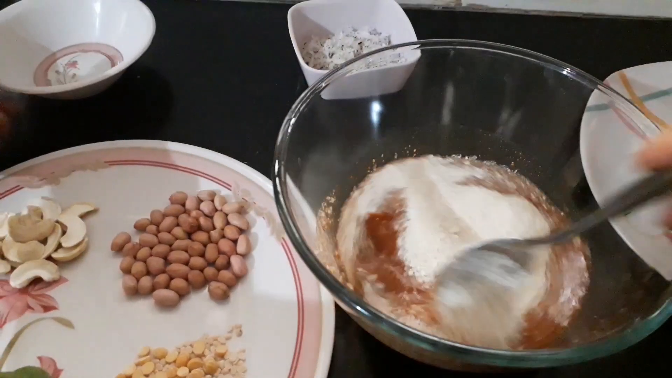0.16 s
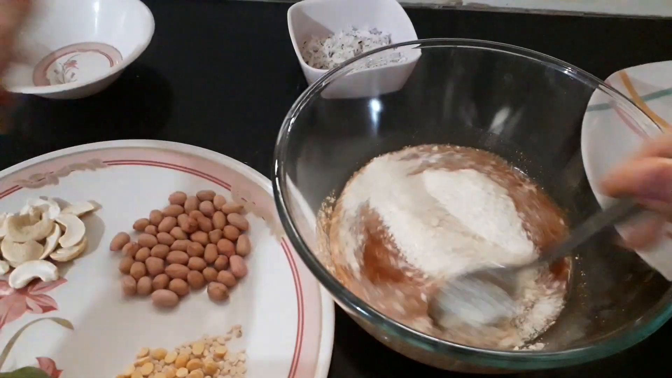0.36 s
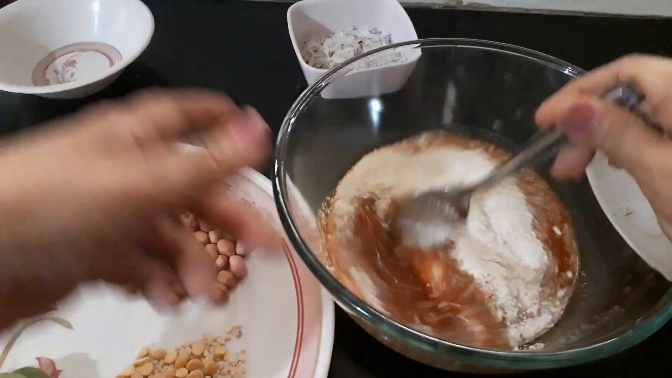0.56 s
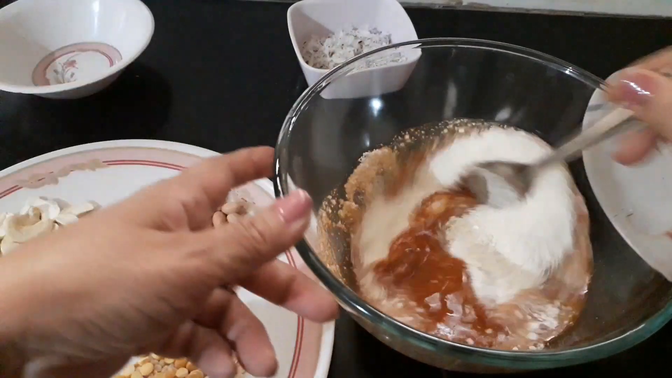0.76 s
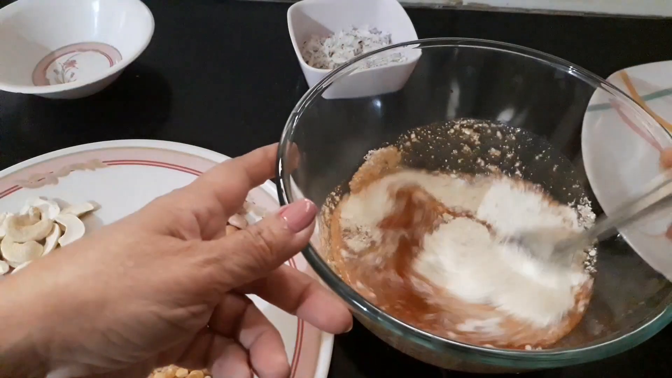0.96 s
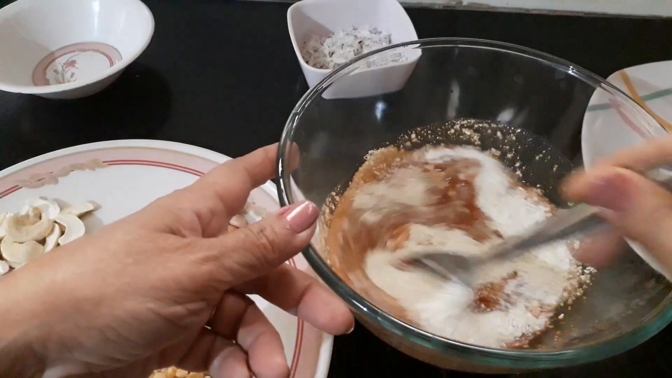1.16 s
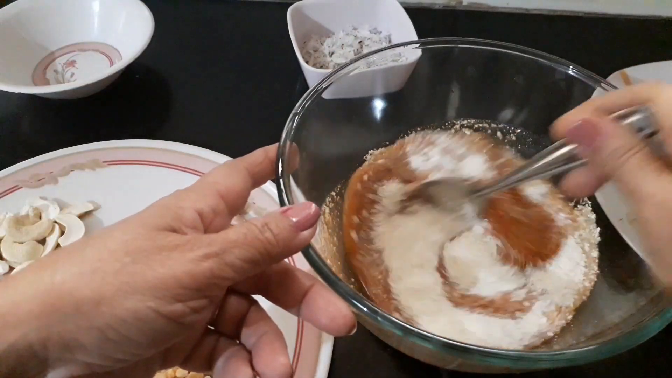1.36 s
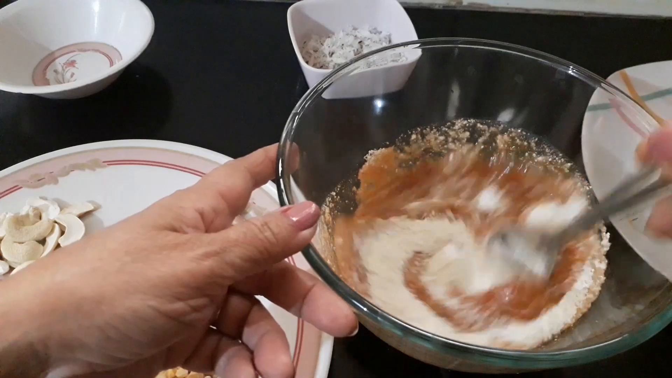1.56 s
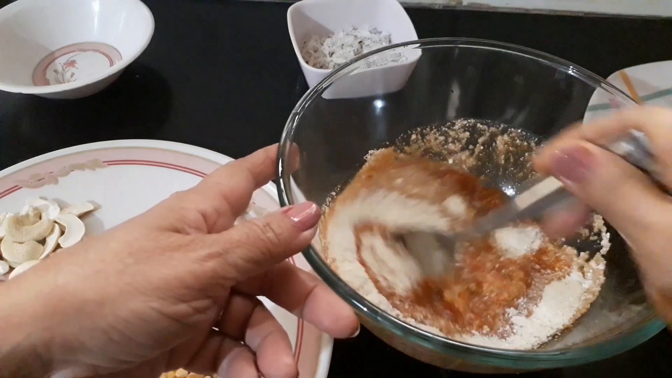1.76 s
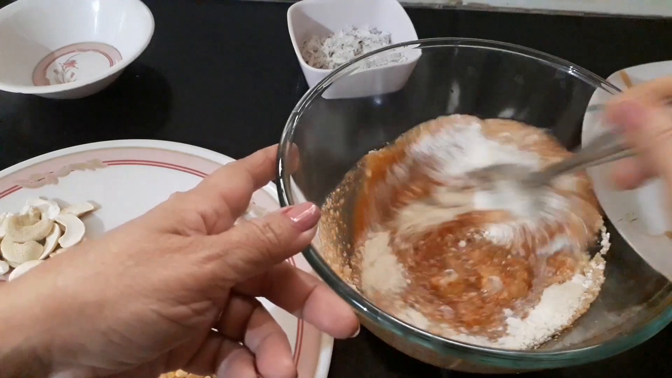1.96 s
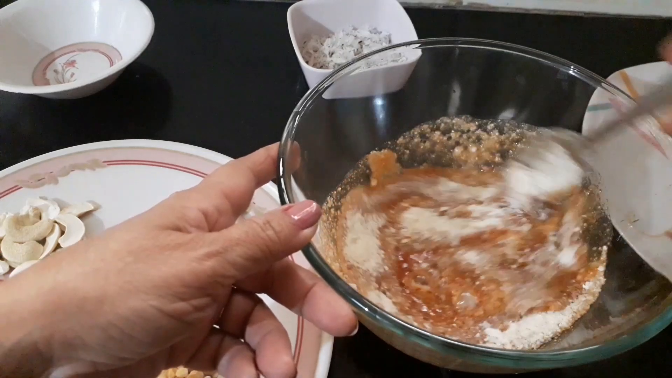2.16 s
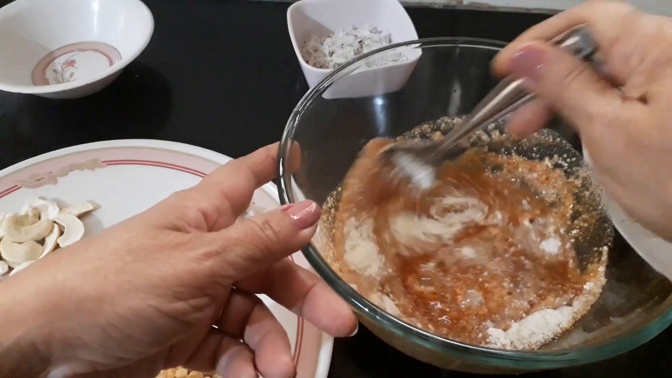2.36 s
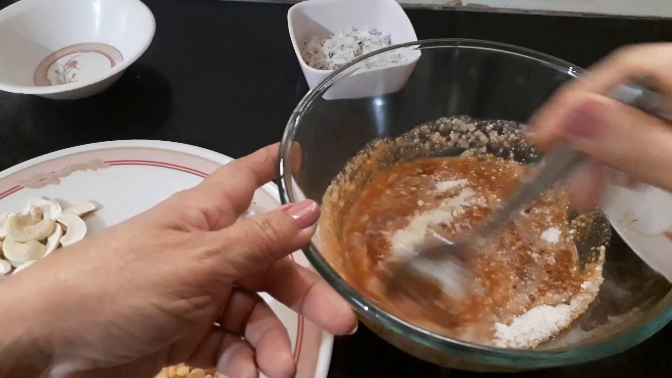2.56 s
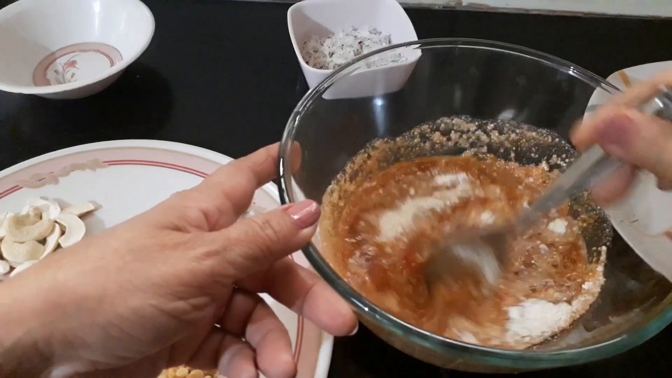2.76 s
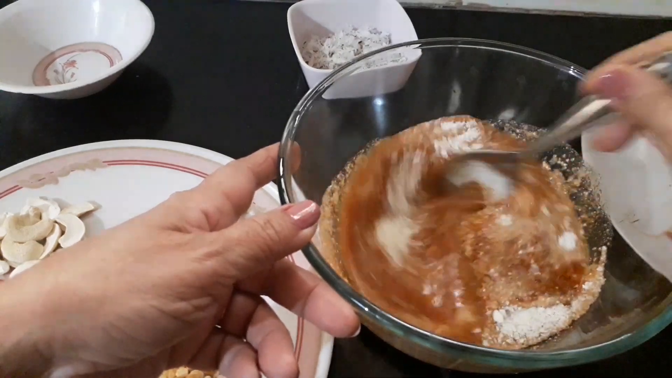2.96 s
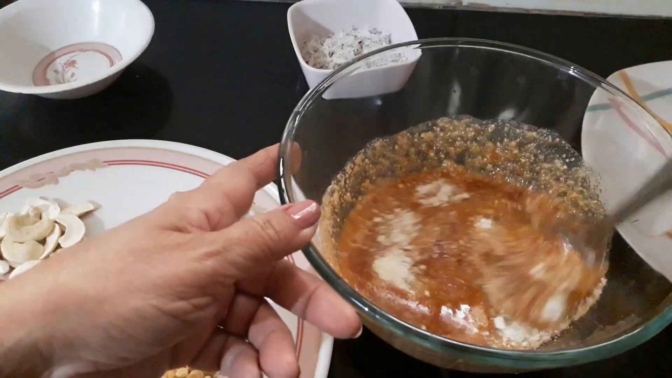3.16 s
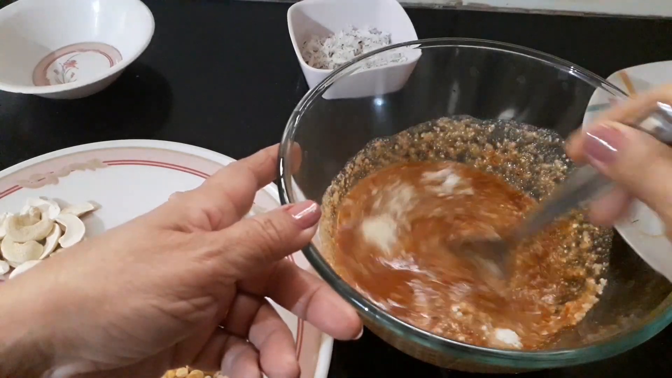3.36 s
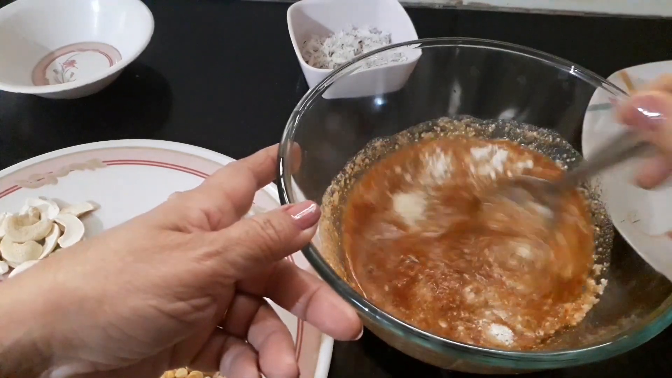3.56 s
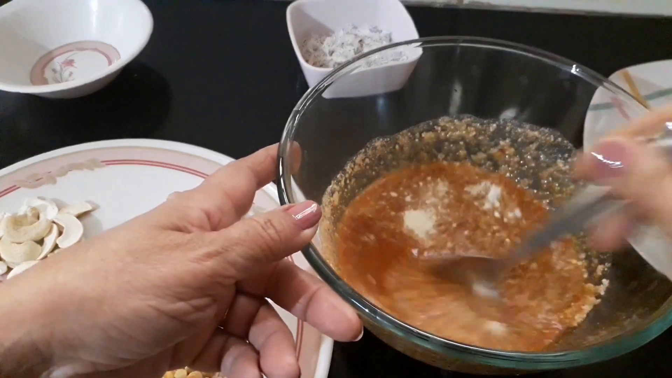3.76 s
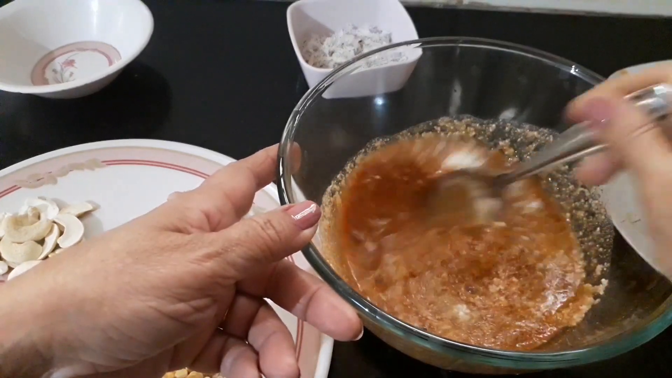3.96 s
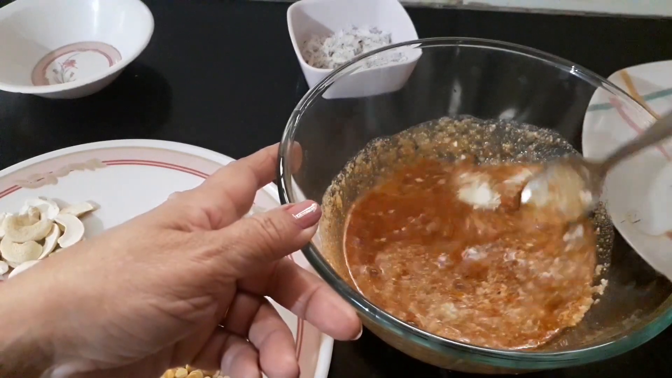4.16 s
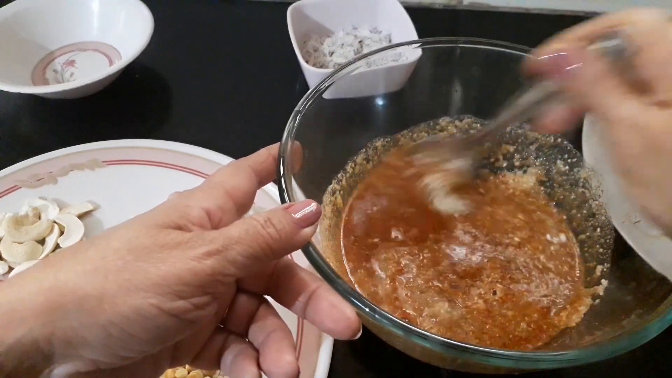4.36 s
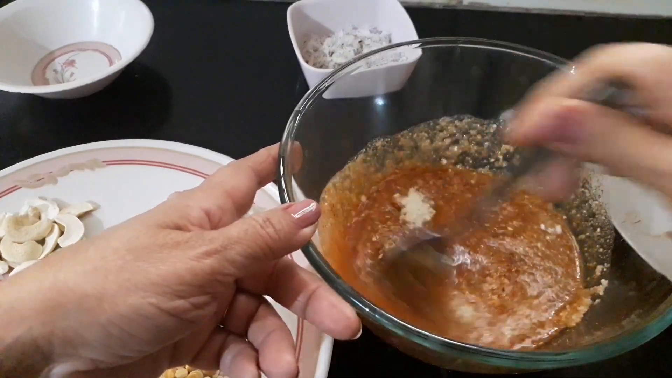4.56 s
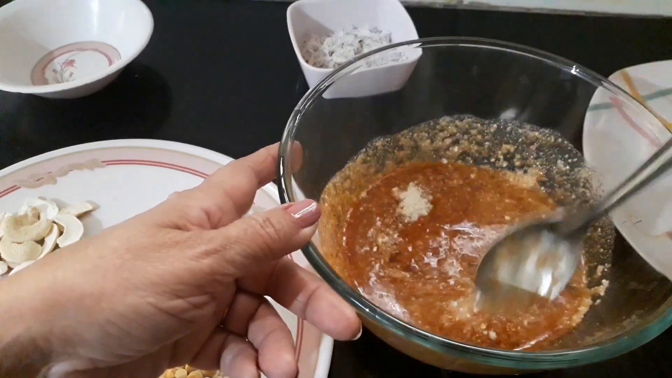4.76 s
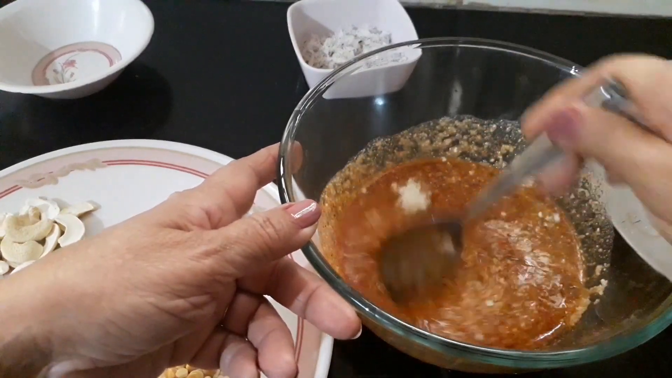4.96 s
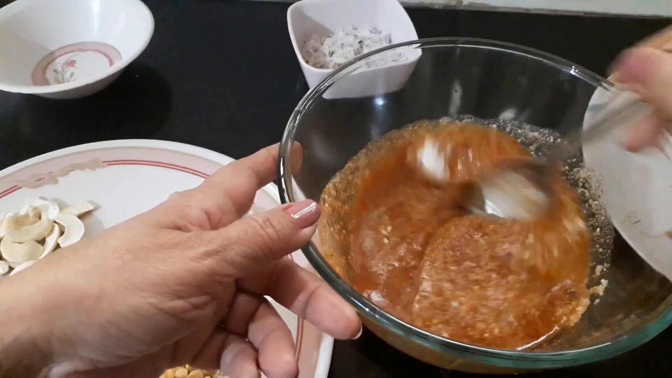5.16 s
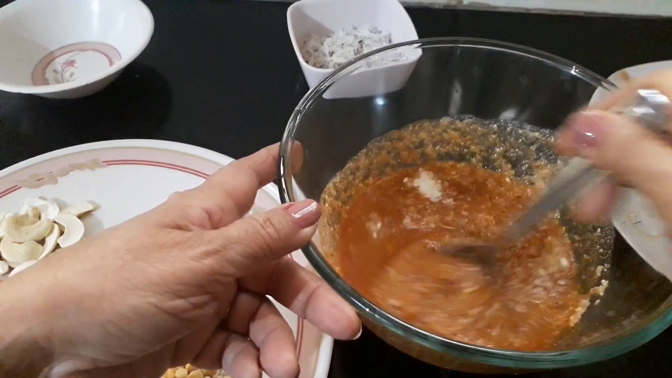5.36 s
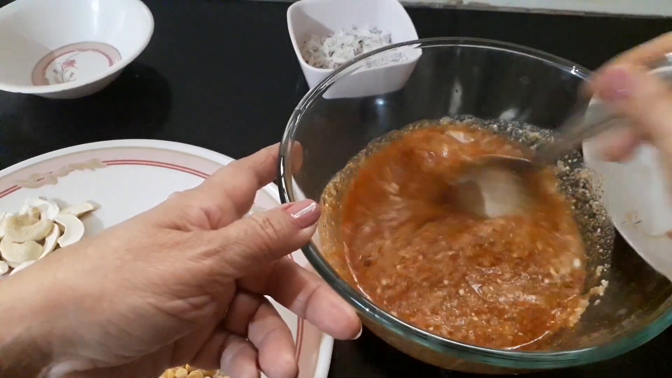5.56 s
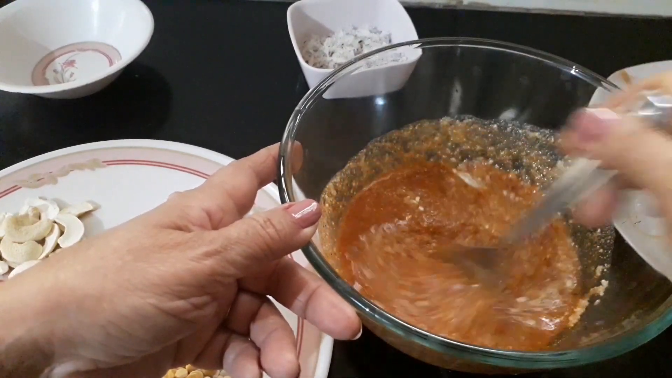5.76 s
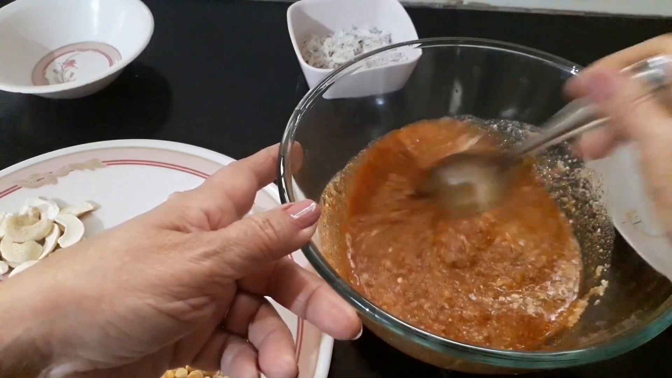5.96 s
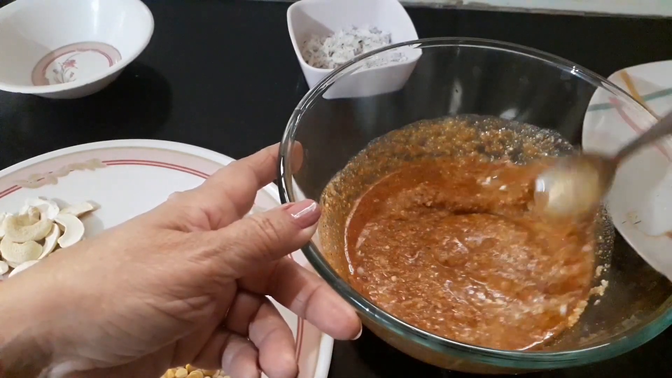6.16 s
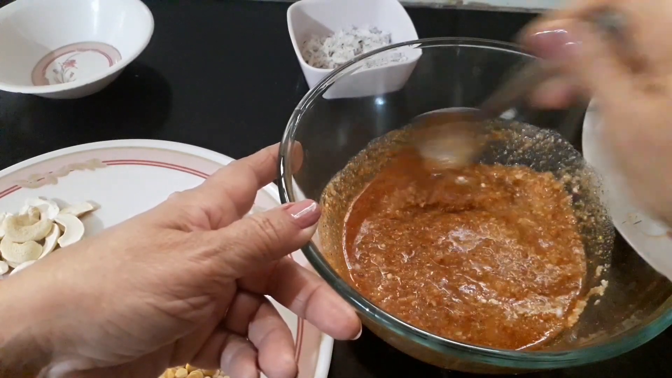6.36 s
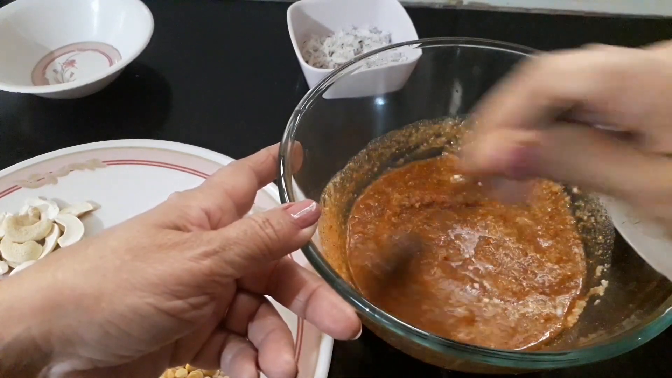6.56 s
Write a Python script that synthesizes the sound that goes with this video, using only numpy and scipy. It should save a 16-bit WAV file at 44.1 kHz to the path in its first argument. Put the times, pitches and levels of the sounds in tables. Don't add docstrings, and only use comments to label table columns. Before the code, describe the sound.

A spoon works a thick mixture in a glass bowl held on a worktop. The opening is quiet, with light ticks, grit and low knocks. Regular sharp glassy clinks follow, each a tiny graze, hit and skip, loudest near the middle and still strong late. Paste slops faintly between. Close microphone, short kitchen reverberation, quiet appliance hum and far traffic.

```python
import sys
import numpy as np
from scipy import signal
from scipy.io import wavfile
from scipy.ndimage import uniform_filter1d

SR = 44100
rng = np.random.default_rng(int(sys.argv[2]) if len(sys.argv) > 2 else 0)


def wav_out(sig):
    wavfile.write(sys.argv[1], SR, np.round(np.clip(np.atleast_2d(sig).T, -1, 1) * 32767).astype(np.int16))


def decibels_to_gain(level_db):
    exponent = np.asarray(level_db, float) / 20
    return 10 ** exponent


N = 291897

# t/s, peak level/dB, brightest f/Hz, graze level/dB, graze lead/ms
BLOWS = [
    (1.5838, -18.5, 11800, -27, 2.7),
    (2.0965, -10.5, 11900, -5, 5.8),
    (2.584, -4.5, 12300, -14, 3.7),
    (3.1622, -9.5, 9450, -19, 4.8),
    (3.695, -11, 11800, -21.5, 7.6),
    (4.1675, -2.5, 12170, -8.5, 10.7),
    (4.650, -9, 9260, -14, 4.2),
    (5.286, -8, 13230, -14, 5.4),
    (5.727, -4.5, 12420, -13.5, 5.8),
    (6.1597, -6, 9800, -6.5, 7.2),
]


def spoon(focus_db, focus_oct):
    # f/Hz, level/dB, t60/s
    glass_modes = [(2500, -30.5, 0.017), (3247, -30.5, 0.094), (3980, -29, 0.077), (4710, -28, 0.032),
                   (5580, -21.5, 0.072), (5997, -10, 0.032), (6270, -11, 0.072), (6830, -7.5, 0.073),
                   (7020, -7, 0.052), (7990, -7.5, .07), (8930, -4, 0.053), (9220, -4.5, 0.037),
                   (9800, -14, 0.032), (9600, 3, 0.054), (10400, 1, 0.037), (10800, 4, 0.051),
                   (10950, -10.5, 0.04), (11610, 3.5, 0.027), (11900, -8, 0.094), (12600, -12.5, 0.045),
                   (12600, 5.5, 0.067), (12800, -12, .03), (13700, -12.5, 0.058), (15100, -1.5, 0.04),
                   (14000, -4, 0.05), (14330, 2.5, 0.054), (15610, -14.5, .035)]
    s, peak_db, bright_hz, top_db, low_db, chatter = contacts()
    hard = np.clip((peak_db[:, None] + 35.5) / 22, 0, 1)
    choke = 2.2 + 1.4 * hard
    chatter_ms = (1.8 + 2.8 * hard) * chatter[:, None]

    def gain_db(hz):
        group_db = 0
        if hz > 12400:
            group_db = top_db + 10.5
        elif hz < 5500:
            group_db = low_db + 28.0
        focus = np.exp(-(np.log2(hz / bright_hz) / focus_oct) ** 2)
        return peak_db - 26.5 - .6 * hard[:, 0] + group_db + focus_db * focus

    out = 0
    for modes, cut_hz in ((glass_modes[:4], 2100), (glass_modes[4:], 5200)):
        rings = strike(modes, s, gain_db, chatter_ms, scatter_db=4.0, choke=choke, count=60)
        out = out + high_pass(rings, cut_hz, order=4)
    return out


def contacts():
    # t/s, peak level/dB, brightest f/Hz, skip level/dB, skip delay/ms
    rebounds = [
        (1.6045, -12.5, 12600, -20.5, 6.7),
        (2.114, -7, 12600, -25, 9.8),
        (2.600, -9, 13100, -17, 8.8),
        (3.1735, -15, 10400, -23.5, 7.4),
        (3.7181, -10.5, 10370, -36, 38),
        (4.1837, -9.5, 10230, -11, 6.9),
        (4.6758, -23, 9700, -53, 9),
        (5.3026, -12.5, 10800, -23, 14),
        (5.7523, -5.5, 9800, -15.5, 15.5),
        (6.178, -8, 10000, -33, 7.8),
    ]
    # t/s, peak level/dB, brightest f/Hz, top modes level/dB
    light_ticks = [(0.1708, -26, 9880, -11.5), (0.243, -48, 11300, -5), (0.4184, -55, 10300, -24),
                   (0.477, -51.5, 9640, -22), (0.9487, -53, 9800, -20), (1.6797, -29, 10500, -16.5),
                   (1.919, -57, 10600, -5.5), (2.379, -35, 11200, -24.5), (2.623, -27.5, 9000, -12),
                   (2.8616, -40, 9900, -15), (2.9784, -50, 11900, -16), (3.1028, -46.5, 11500, -12),
                   (3.1944, -24, 9800, -16), (1.477, -57, 11500, -13), (3.775, -27, 9600, -11),
                   (3.816, -35.5, 13000, -12.5), (4.0525, -46, 10630, -31.5), (4.088, -49.5, 9370, -22.5),
                   (4.462, -51, 11800, -12), (4.4933, -51.5, 7700, -16.5), (5.0016, -32, 9300, -14),
                   (5.086, -34.5, 10840, -37.5), (5.226, -48, 10400, -31), (5.241, -46, 10500, -18),
                   (5.271, -29.5, 12300, -23.5), (5.336, -20, 9220, -11.5), (5.7152, -30.5, 10700, -13.5),
                   (5.9958, -33, 11200, -33), (6.2736, -30, 9700, -14.5)]
    # t/s, peak level/dB, brightest f/Hz, low modes level/dB
    muffled_ticks = [(0.0514, -51, 7670, -22), (1.1772, -33, 8600, -21), (1.2465, -41, 8850, -25.5),
                     (1.357, -47, 8800, -25.5), (2.3695, -35.5, 9100, -14), (3.032, -51.5, 6360, -27),
                     (4.902, -34.5, 8140, -20.5), (5.506, -38, 5940, -22), (5.6262, -45, 6950, -22),
                     (5.976, -43, 6600, -27), (6.392, -23.5, 6700, -19)]
    # middle tick t/s, peak level/dB, brightest f/Hz, gap/ms, first tick level/dB
    stutters = [
        (0.0884, -31, 9900, 14, -35),
        (0.8389, -36.5, 9650, 7.5, -43),
        (1.039, -34, 11900, 13.8, -33.5),
        (2.9105, -38.5, 9600, 14, -42),
        (6.4850, -42, 7300, 17, -38),
    ]
    graze, blow, settle = (-15, -27.5), (-13, -22), (-12, -21.5)
    rebound, skip, stutter = (-14.5, -20.5), (-9, -19), (-16.5, -25)
    blow_chatter, rebound_chatter, skip_chatter = .8, .55, .6

    rows = [(s, db, hz, top_db, -18.5, 1) for s, db, hz, top_db in light_ticks]
    rows += [(s, db, hz, -27.5, low_db, 1) for s, db, hz, low_db in muffled_ticks]
    for s, db, hz, graze_db, lead_ms in BLOWS:
        rows += [(s - lead_ms / 1000, graze_db, 11800, *graze, 1),
                 (s, db, hz, *blow, blow_chatter),
                 (s + 0.0082, db - 12.5, 11200, *settle, skip_chatter)]
    for s, db, hz, skip_db, delay_ms in rebounds:
        rows += [(s, db, hz, *rebound, rebound_chatter),
                 (s + delay_ms / 1000, skip_db, 9700, *skip, skip_chatter)]
    for s, db, hz, gap_ms, first_db in stutters:
        rows += [(s - gap_ms / 1000, first_db, hz, *stutter, 1),
                 (s, db, hz, *stutter, 1),
                 (s + gap_ms / 1000, db - 2.5, hz, *stutter, 1)]
    return np.transpose(rows)


def strike(body, s, gain_db, chatter_ms, scatter_db, choke, count):
    wait = (rng.random((len(s), count)) * 4.6 - .9) * chatter_ms / 1000
    at = (np.clip(s[:, None] + wait, 0, None) * SR).astype(int).ravel()
    graze = .03 * np.exp(wait * 2500 / chatter_ms)
    attack = np.clip(0.23 + wait * 900 / chatter_ms, 0, 1)
    thinning = np.exp(-(wait * 520 / chatter_ms) ** 2)
    fade = np.where(wait < 0, graze, thinning * attack)
    fade = fade / np.sqrt(np.sum(fade ** 2, axis=1, keepdims=True))
    luck = rng.standard_normal((len(s), len(body)))
    grain = rng.standard_normal((len(s), 3, len(body), count))
    free, held = np.zeros((2, N))
    for k, (hz, level_db, t60) in enumerate(body):
        strength = decibels_to_gain(gain_db(hz) + level_db + scatter_db * luck[:, k])[:, None] * fade
        clicks = []
        for j, share in enumerate((1, choke, choke)):
            heights = strength * grain[:, j, k] * share
            clicks.append(np.bincount(at, heights.ravel(), N)[:N])
        free += ring(clicks[0], hz, t60)
        held += ring(clicks[1], hz * 1.025, t60 * .3)
        held += ring(clicks[2], hz * .975, t60 * .18)
    return free, held


def cracks():
    # t/s, peak level/dB, three ring f/Hz
    edge_taps = [(0.724, -58, 3620, 3950, 3300), (0.7360, -59, 3520, 4000, 4600),
                 (0.764, -54, 3320, 3800, 5200), (0.8150, -66, 3700, 4100, 4500),
                 (0.8350, -66, 3250, 3300, 3960), (0.9150, -58, 3150, 3200, 2900),
                 (0.9290, -62, 3170, 3050, 3400), (0.9490, -57, 4200, 4700, 5300),
                 (0.9560, -53, 3030, 2800, 4030), (1.6058, -9, 9600, 12600, 15100),
                 (1.6816, -26, 1900, 3160, 1140), (2.2510, -53.5, 509, 1492, 3900),
                 (2.2610, -43.5, 565, 1640, 3770), (2.2750, -52, 597, 1600, 3720),
                 (2.31, -58.5, 520, 1750, 3900), (2.37, -52, 3510, 3820, 4700),
                 (3.8167, -34, 1105, 3310, 6460), (3.8177, -35, 441, 1588, 3760),
                 (6.3932, -21.5, 4030, 4650, 6750), (6.3943, -22.5, 4620, 5720, 11600),
                 (6.4, -31.5, 3860, 6700, 2550), (6.475, -33, 4320, 4700, 7440),
                 (2.0914, -18, 9900, 12030, 14500), (2.1135, -16, 10000, 12300, 15000),
                 (5.754, -15, 10200, 12800, 15100), (5.768, -28, 10000, 12800, 15100),
                 (5.7950, -29, 10000, 12800, 15100), (4.8810, -49.5, 1100, 1500, 700),
                 (3.721, -23, 9900, 12500, 14500), (2.2280, -50, 12000, 14000, 10500),
                 (2.2620, -43, 12500, 9400, 6500), (1.1774, -28, 4220, 3310, 1206),
                 (1.2490, -48.5, 4400, 4020, 6500), (6.1790, -12, 9900, 11300, 13000),
                 (3.6970, -18.5, 12000, 12560, 7000), (1.9190, -50.5, 10960, 12860, 15020),
                 (5.9490, -58, 10400, 12540, 14000)]
    # t/s, peak level/dB, three ring f/Hz
    more_cracks = [
        (5.781, -27, 10000, 8200, 15100),
        (0.401, -60, 10000, 4000, 6500),
        (0.419, -58, 10500, 6000, 14500),
        (3.8168, -40, 9000, 11500, 14500),
        (3.756, -33, 10500, 12500, 15000),
        (1.477, -55.5, 11000, 13000, 15000),
        (5.139, -59, 9550, 6000, 3000),
        (5.227, -48, 9000, 11000, 12500),
        (4.6915, -34, 9800, 11500, 13500),
    ]
    events = edge_taps + more_cracks
    t = np.arange(2048) / SR
    out = np.zeros(N + len(t))
    for (s, db, *pitches), hiss in zip(events, rng.standard_normal((len(events), len(t)))):
        burst = hiss * np.exp(-t * 1000 / 0.97)
        burst = burst / np.sqrt(np.sum(burst ** 2))
        snap = band_pass(burst, min(pitches) * .6, min(max(pitches) * 1.6, 16000))
        rings = sum(ring(burst, hz, .026 * (1000 / hz) ** .5) for hz in pitches)
        rings = high_pass(rings, min(pitches) * .75, order=2)
        out[round(s * SR):][:len(t)] += decibels_to_gain(db) * (.5 * rings + decibels_to_gain(-9.5 + 11.0) * snap)
    return out[:N]


def drags(per_s):
    # from t/s, to t/s, level/dB, low f/Hz, high f/Hz
    grit_drags = [
        (0.713, 0.837, -76.5, 3420, 4200),
        (0.988, 1.06, -65.5, 3700, 5850),
        (4.489, 4.532, -66, 2500, 15500),
        (1.593, 1.607, -30, 7600, 15000),
        (6.395, 6.47, -60.5, 5020, 15000),
        (6.468, 6.502, -46.5, 3480, 15000),
    ]
    grains = grit_clicks(per_s, spread_db=2.5)
    out = 0
    for start, stop, db, low_hz, high_hz in grit_drags:
        out = out + decibels_to_gain(db) * gate(start, stop, 0.0059) * rms_one(band_pass(grains, low_hz, high_hz))
    return out


def lingers():
    # t/s, level/dB, f/Hz, t60/s
    singing_modes = [(2.100, -42, 6700, 0.31), (2.580, -49, 3250, .08), (2.600, -40, 3270, .1),
                     (2.655, -55.5, 850, 0.75), (0.833, -66, 3230, 0.18), (5.086, -42, 13000, 0.06),
                     (1.607, -36, 8200, .08), (3.697, -53, 3250, 0.15), (5.729, -36, 6700, 0.1),
                     (5.752, -28, 15000, .05), (0.97, -72, 4020, 0.38), (6.394, -51, 6620, 0.071),
                     (5.997, -54, 11100, 0.15), (3.765, -39, 12600, .04), (3.5, -56, 6800, 0.11),
                     (3.692, -33, 7000, .07), (4.461, -59, 12300, .04), (3.776, -43, 8200, .04),
                     (5.002, -57, 6700, 0.24), (5.768, -30, 15100, .04), (6.274, -42, 15300, .04)]
    steady_s = .035
    t = np.arange(SR // 2) / SR
    out = np.zeros(N + len(t))
    for (s, db, hz, t60), hiss in zip(singing_modes, rng.standard_normal((len(singing_modes), len(t) + 2000))):
        waver = rms_one(ring(hiss, hz, steady_s)[2000:]) + .8 * np.sin(2 * np.pi * hz * t)
        out[round(s * SR):][:len(t)] += decibels_to_gain(db - 4.5 - 60 * t / t60) * np.clip(t / .002, 0, 1) * waver
    return out[:N]


def paste(per_s):
    # t/s, level/dB
    stir_pressure = [(0.0, -45.5), (0.11, -74), (0.28, -60.5), (0.6, -70.5), (1.09, -63.5), (1.7, -73.5),
                     (1.9, -65), (2.1, -78), (2.269, -57.5), (2.7, -78.5), (2.93, -63), (3.52, -72.5),
                     (4.199, -69), (4.74, -78), (5.57, -68.5), (5.84, -63), (6.189, -77), (6.62, -67)]
    # t/s, level/dB, half length/s
    traffic_passes = [
        (0.1, -72, 0.085),
        (1.9, -68, 0.076),
        (3.999, -61, 0.34),
        (4.35, -65, 0.041),
        (5.306, -61, 0.18),
        (5.752, -56, 0.12),
        (6.52, -51, 0.26),
    ]
    grit_db = np.interp(np.arange(N) / SR, *np.transpose(stir_pressure))
    grains = grit_clicks(per_s, spread_db=2.1)
    grit = ring(grains, 9700, .002) + ring(grains, 11100, .0016)
    grit += .5 * ring(grains, 13500, .001) + .3 * ring(grains, 6800, .002)
    slop = swells(-67.5, [(s + 0.021, -63, 0.045) for s, *_ in BLOWS])
    slosh = rms_one(band_pass(rng.standard_normal(N), 357, 692))
    rumble = rms_one(band_pass(rng.standard_normal(N), 119, 227))
    out = decibels_to_gain(grit_db - 7) * rms_one(grit)
    out += slop * decibels_to_gain(-9.5 + 2.6 * drift(30)) * slosh
    return out + swells(-60.5, traffic_passes) * decibels_to_gain(-8.5) * rumble


def knocks(focus_db, focus_oct):
    # f/Hz, level/dB, t60/s
    bowl_modes = [(202.6, -13, 0.026), (364, -5.5, 0.015), (441, -4.5, 0.08), (562.4, -3, 0.046),
                  (700, -4.5, 0.038), (906, -14, 0.06), (1070, 6, 0.037), (1201, 1.5, 0.031),
                  (1409, -2, 0.04), (1610, -8.5, 0.15), (1840, 6, 0.02), (2096, -2, 0.035),
                  (2364, -6, 0.063), (2840, -7.5, 0.074), (3300, 0, 0.032), (3700, -4.5, 0.034),
                  (3920, -3, 0.042), (4400, -7.5, 0.012), (4950, 5, 0.0015), (5800, -10, 0.019),
                  (6940, -16.5, 0.01)]
    # t/s, peak level/dB, strongest ring f/Hz, middle modes level/dB, room level/dB
    bowl_thuds = [
        (0.328, -34.5, 1430, -32, -8.5),
        (1.011, -22.5, 1070, -22, -11),
        (1.038, -30, 910, -27, -8),
        (2.259, -37, 571, -38.5, -1.5),
        (2.653, -27, 438, -19.5, -6),
        (2.979, -56.5, 1610, -2, -14.5),
        (4.882, -31, 1404, -16.5, -2.5),
        (6.495, -54.5, 1430, 1.5, 3),
    ]
    # t/s, peak level/dB, strongest ring f/Hz, middle modes level/dB, room level/dB
    bowl_taps = [(0.736, -67, 3900, -40, -3), (0.764, -66, 3830, -39, -5), (0.955, -60, 2960, -20, -4),
                 (1.177, -26.5, 3470, -8, -10), (1.25, -41, 1330, -7.5, -2), (1.682, -34, 1850, -5, -9.5),
                 (2.37, -55, 3640, -30.5, -7), (3.108, -53.5, 3800, -34.5, -17),
                 (3.324, -47.5, 1840, -9, -11.5), (3.817, -43, 1120, -1.5, -4),
                 (4.169, -30.5, 5290, -10, -19), (4.904, -26, 3660, -19, -14),
                 (5.248, -53, 2790, -6.5, 0.5), (5.344, -34.5, 1070, -8.5, -13),
                 (5.507, -52.5, 3900, -37, -12), (5.729, -37, 3460, -13.5, -6),
                 (6.393, -33, 2600, -11.5, -8.5), (6.474, -31, 4200, -27, -12.5)]
    rows = [(*row, -38.5) for row in bowl_thuds] + [(*row, -0.5) for row in bowl_taps]
    s, peak_db, ring_hz, middle_db, room_db, glassy_db = np.transpose(sorted(rows))

    def gain_db(hz):
        group_db = -6.0
        if hz > 2200:
            group_db = glassy_db
        elif hz > 900:
            group_db = middle_db
        focus = np.exp(-(np.log2(hz / ring_hz) / focus_oct) ** 2)
        return peak_db - 14.5 + group_db + focus_db * focus

    free, held = strike(bowl_modes, s, gain_db, 1.4, scatter_db=2.0, choke=1.58, count=40)
    latest = np.clip(np.searchsorted(s, np.arange(N) / SR) - 1, 0, None)
    return free + held, (0.6 * free + held) * decibels_to_gain(room_db)[latest]


def worktop():
    # t/s, level/dB
    thumps = [
        (4.169, -42.5),
        (5.726, -55),
    ]
    # t/s, level/dB, f/Hz, t60/s
    chime = (6.479, -49.5, 1356, 0.18)
    shove, tap = np.zeros((2, N))
    for s, db in thumps:
        shove[round(s * SR)] = decibels_to_gain(db)
    s, db, hz, t60 = chime
    tap[round(s * SR) + np.array([0, 260, 730])] = decibels_to_gain(db) * np.array([.7, 1, .6])
    thud = ring(shove, 85, 0.059) + ring(shove, 210, 0.055) + 0.54 * ring(shove, 570, 0.011)
    return thud + ring(tap, hz, t60)


def dish():
    # f/Hz, level/dB, t60/s
    dish_modes = [(417, -2.5, 2.0), (790, 4.5, 0.35), (1263, 5.5, 0.78), (1462, 12.5, 0.57),
                  (1810, 9, 0.83), (2034, 4.5, 0.55), (2670, 4.5, 0.31), (3800, -6.5, 0.22),
                  (4700, -12, 0.16), (4850, 3, 0.72), (5290, -4, 0.41), (8200, -11, 5.0), (7300, -8, 0.39)]
    t = np.arange(N) / SR
    start = np.arange(N) == 0
    shake = rng.standard_normal((len(dish_modes), N)) * decibels_to_gain(-60 * t / 0.51)
    rings = sum(decibels_to_gain(db) * ring(start, hz, min(t60, .5)) for hz, db, t60 in dish_modes)
    wash = sum(decibels_to_gain(db) * ring(e, hz, 0.012) for (hz, db, _), e in zip(dish_modes, shake))
    return decibels_to_gain(-56.5) * rings + decibels_to_gain(-42.5 - 21) * wash


def kitchen(x):
    # f/Hz, t60/s
    room_decay = [(300, 0.32), (800, 0.53), (2000, 0.35), (5500, 0.4), (10000, 0.22), (15000, .18)]
    t = np.arange(SR * 2 // 3) / SR
    white = rng.standard_normal((2, len(t)))
    tail = sum(b * decibels_to_gain(-60 * t / at_hz(room_decay, hz)) for hz, b in bands(white))
    tail = tail * np.clip((t - .003) / 0.0025, 0, 1)
    return signal.fftconvolve(x, tail / np.sqrt(np.sum(tail ** 2)))[:N]


def street():
    # f/Hz, level/dB
    horn_partials = [(1290, -2), (1707, -2), (2550, -5), (3385, -5), (3735, -1)]
    # from t/s, to t/s, level/dB, low partials level/dB
    horn_blasts = [
        (4.937, 5.265, -65, -19),
        (5.225, 5.93, -69, -32.5),
        (5.948, 6.425, -60, 4.5),
    ]
    # f/Hz, level/dB, length/s
    rim_squeak = [(1395, -78.5, 0.17), (1886, -72.5, 0.091), (2466, -76.5, 0.093), (3660, -75.5, 0.051)]
    squeak_s = 4.49
    out = np.zeros(N)
    for hz, level_db in horn_partials:
        on = sum(decibels_to_gain(db + low_db * (hz < 2000)) * gate(a, b, 0.061) for a, b, db, low_db in horn_blasts)
        tone = rms_one(ring(rng.standard_normal(N), hz, .11))
        out += on * decibels_to_gain(level_db - 16 + 3.5 * drift(4)) * tone
    for hz, db, long_s in rim_squeak:
        tone = rms_one(ring(rng.standard_normal(N), hz, 0.055))
        out += decibels_to_gain(db + 1.5) * gate(squeak_s, squeak_s + long_s, 0.023) * tone
    return out


def background(patchy_db):
    # f/Hz, level per Hz/dB
    noise_spectrum = [(18, -40), (30, -15.5), (75, 1.5), (194, -1.5), (295, -27.5), (384, -6), (540, -15.5),
                      (780, -35.5), (988, -25.5), (1670, -23), (2120, -28), (3770, -27), (8520, -33.5),
                      (10500, -15.5), (16000, -54)]
    # f/Hz, width/Hz, rms level/dB
    motor_hums = [(47, 14, -76), (85.5, 45, -66.5), (126, 5.3, -79.5), (217, 36, -72), (395, 49, -73),
                  (531, 4.9, -78)]
    together = drift(3.5)
    noise = 0
    for hz, b in bands(rng.standard_normal((2, N))):
        patchy = patchy_db * (0.25 * together + drift(13))
        noise = noise + b * decibels_to_gain(at_hz(noise_spectrum, min(hz, 14000)) + patchy)
    hum = 0
    for hz, width_hz, db in motor_hums:
        hum = hum + decibels_to_gain(db) * rms_one(ring(rng.standard_normal(N), hz, 4.4 / width_hz))
    return decibels_to_gain(-61 - 5.0) * rms_one(noise) + hum


def difference(mono):
    hiss_db, flutter_db, flutter_full_db = -84, -29.5, -27
    loud = np.clip(uniform_filter1d(np.abs(mono), size=200) / decibels_to_gain(flutter_full_db), .1, 1)
    flutter = decibels_to_gain(flutter_db) * loud * drift(250) * signal.lfilter([1, .4, -.6], [1], mono)
    hiss, rumble = rng.standard_normal((2, N))
    rumble = rms_one(band_pass(rumble, 50, 600, order=1))
    return flutter + decibels_to_gain(hiss_db) * signal.lfilter([1, -.3], [1], hiss) + decibels_to_gain(hiss_db - 7.5) * rumble


def rms_one(x):
    return x / np.sqrt(np.mean(x ** 2) + 1e-20)


def at_hz(points, hz):
    table_hz, values = np.transpose(points)
    return np.interp(np.log(hz), np.log(table_hz), values)


def band_pass(x, low_hz, high_hz, order=2):
    return signal.sosfilt(signal.butter(order, [low_hz, high_hz], "band", fs=SR, output="sos"), x)


def high_pass(x, hz, order):
    return signal.sosfilt(signal.butter(order, hz, "high", fs=SR, output="sos"), x)


def drift(rate):
    r = np.exp(-80 * np.pi * rate / SR)
    slow = signal.lfilter([1], [1, -2 * r, r * r], rng.standard_normal(N // 40 + 2002))[2000:]
    return np.interp(np.arange(N) / 40, np.arange(len(slow)), rms_one(slow))


def ring(clicks, hz, t60):
    r, w = decibels_to_gain(-60 / (t60 * SR)), 2 * np.pi * hz / SR
    return signal.lfilter([0, np.sin(w)], [1, -2 * r * np.cos(w), r * r], clicks + 1e-18)


def grit_clicks(per_s, spread_db):
    hits = rng.random(N) < per_s / SR
    heights = decibels_to_gain(spread_db * np.minimum(rng.exponential(1, N), 4))
    return hits * heights * rng.choice([-1, 1], N)


def bands(white):
    edges = 28 * 2 ** np.arange(0, 9.6, .5)
    for k, (low, high) in enumerate(zip(edges, edges[1:])):
        yield np.sqrt(low * high), band_pass(white[k % 2], low, high)


def gate(start, stop, rise):
    t = np.arange(N) / SR
    return np.clip(np.minimum(t - start, stop - t) / rise, 0, 1)


def swells(rest_db, rows):
    t = np.arange(N) / SR
    return decibels_to_gain(rest_db) + sum(decibels_to_gain(db) * np.exp(-((t - s) / half_s) ** 2) for s, db, half_s in rows)


def scene():
    free, held = spoon(focus_db=8.5, focus_oct=0.07)
    knock, knock_to_room = knocks(focus_db=8.0, focus_oct=.12)
    shoves = worktop()
    room = kitchen(decibels_to_gain(-15.0) * free + decibels_to_gain(-11.0) * held + decibels_to_gain(7.5) * knock_to_room + decibels_to_gain(-14.0) * shoves)
    mono = free + held + knock + shoves + room
    mono = mono + dish() + background(patchy_db=3.5) + paste(per_s=2600.0) + street()
    edge = cracks() + drags(per_s=2800.0) + lingers()
    mono = mono + edge + decibels_to_gain(-12) * kitchen(edge)
    side = difference(mono)
    return np.array([mono + side, mono - side])


def band_limit(x):
    return signal.sosfilt(signal.butter(12, 16800, fs=SR, output="sos"), x)


def record(dry):
    cut = high_pass(dry, 40, order=4)
    cut = signal.sosfilt(signal.ellip(5, .5, 20, 15780, fs=SR, output="sos"), cut)
    cut = signal.sosfilt(signal.cheby2(14, 60, 16900, fs=SR, output="sos"), cut)
    return band_limit(cut)


dry = scene()
out = record(dry)
wav_out(out)
```